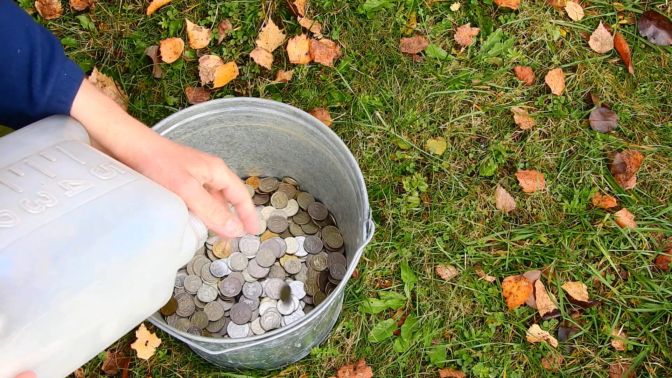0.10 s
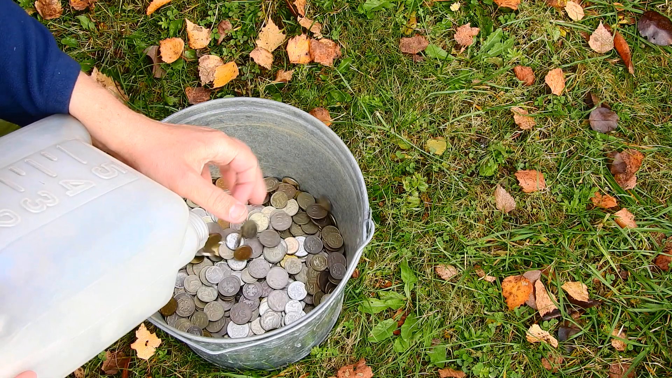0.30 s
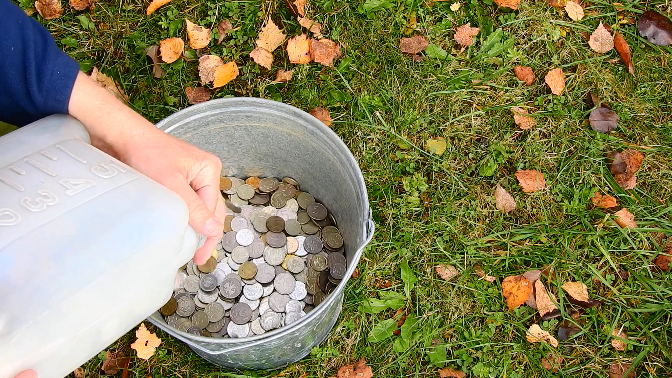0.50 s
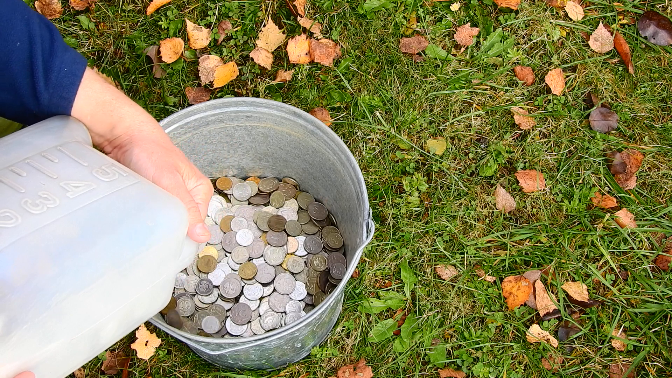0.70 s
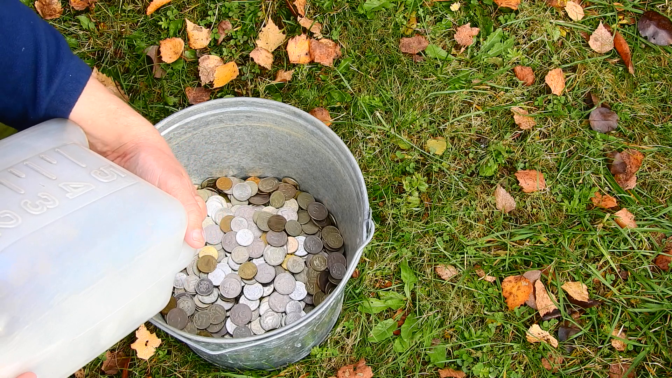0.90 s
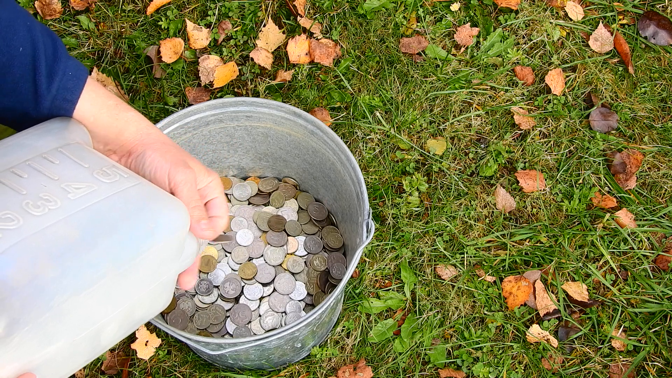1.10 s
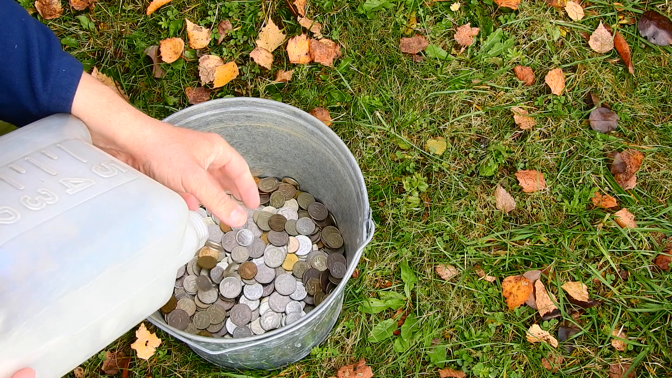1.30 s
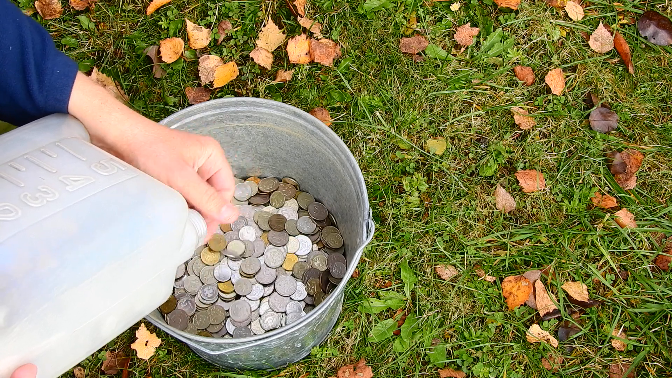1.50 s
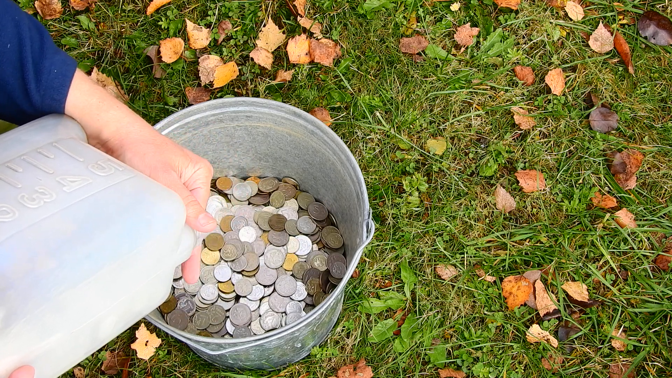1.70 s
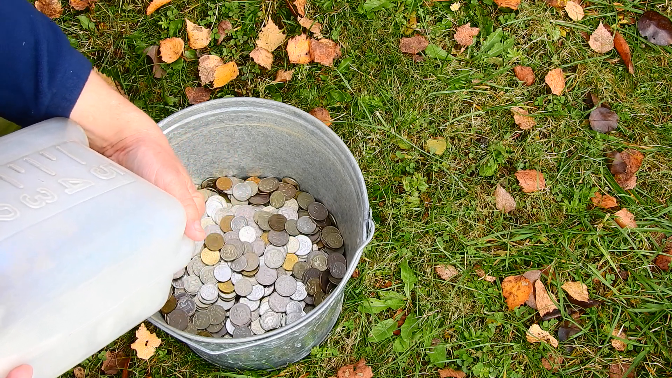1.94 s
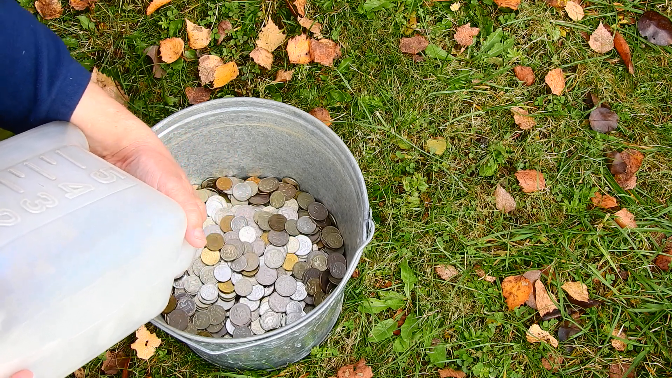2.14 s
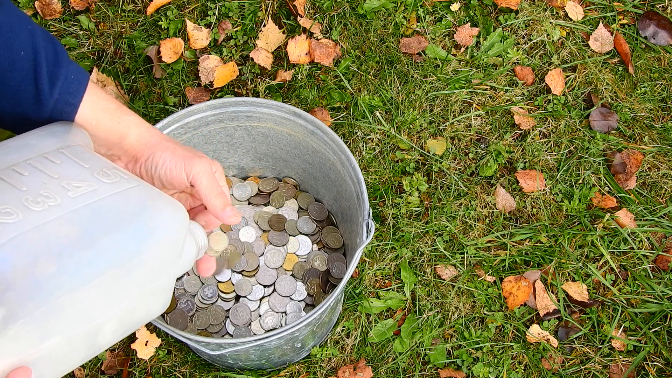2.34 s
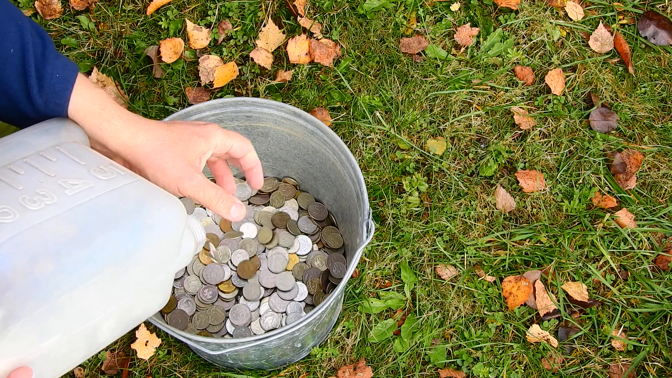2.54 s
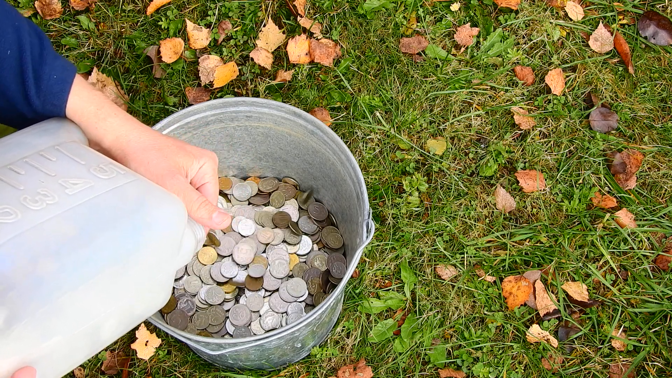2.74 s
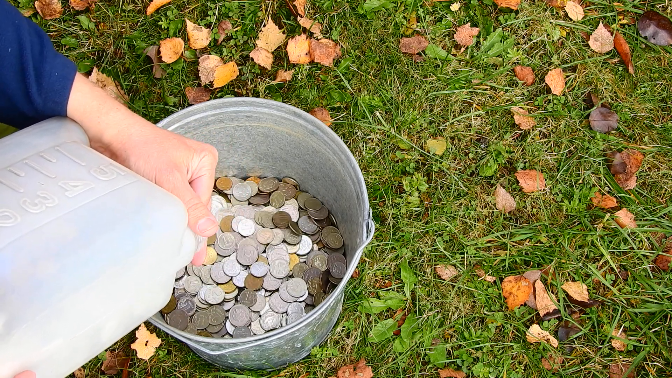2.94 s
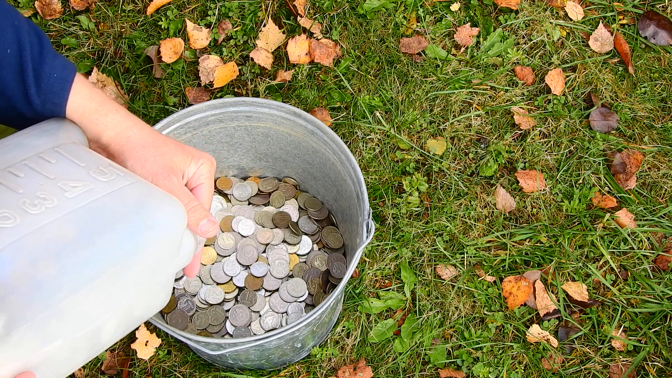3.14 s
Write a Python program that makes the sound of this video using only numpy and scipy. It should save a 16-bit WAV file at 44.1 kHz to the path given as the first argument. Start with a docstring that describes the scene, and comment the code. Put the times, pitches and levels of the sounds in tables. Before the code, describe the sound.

Coins clatter brightly into a metal bucket in bursts, with scraping inside a plastic canister between them

```python
"""Small coins drop on the pile in a steel bucket: three handfuls and a few strays, raked by hand from a canister.
Outdoors, recorded close in stereo. Each landing is a noise crack and a patter of contacts through pile resonances,
with a thump of decaying modes from the bucket's bottom. Loose coins are dying sine partials, muted by the pile.
Inside the plastic canister coins scrape and slip as coloured contacts, over faint noise of the open air.
The recorder passes the treble slightly late, clips on the hardest clinks and cuts the very top."""
import sys
import numpy as np
from scipy import signal
from scipy.fft import rfft, irfft, next_fast_len
from scipy.io import wavfile
from scipy.ndimage import uniform_filter1d

SR = 44100
rng = np.random.default_rng(int(sys.argv[2]) if len(sys.argv) > 2 else 0)


def file_out(sig):
    """Save sig as 16-bit WAV at sys.argv[1]."""
    # one column per channel
    cols = np.atleast_2d(sig).T
    # limit, then scale
    lim = np.clip(cols, -1, 1)
    pcm = np.round(lim * 32767).astype(np.int16)
    wavfile.write(sys.argv[1], SR, pcm)


N = 143325

# stereo place of the pile and loose coins: left over right, and its scatter
PAN_DB, PAN_SPREAD_DB = 2.5, 3
RIPPLE_HZ = 190  # spacing of the random resonances in a heap


def undb(db):
    """Decibels to gain."""
    return 10 ** (np.asarray(db) / 20)


def unit(x):
    """Scale to rms 1."""
    return x / np.sqrt(np.mean(x ** 2) + 1e-18)


def curve(table, index):
    """Gain over time, interpolated in dB from one column of a table."""
    rows = np.array(table, float)
    return undb(np.interp(np.arange(N) / SR, rows[:, 0], rows[:, index]))


def response(colour, ripple_db=0, detune=0):
    """Minimum-phase impulse response of a colour; ripple and detuning give each spot its own resonances."""
    size = 4096
    hz, db = np.array(colour, float).T
    hz = hz * (1 + detune * (2 * rng.random() - 1))
    bins = np.fft.rfftfreq(size, 1 / SR)
    knots = np.arange(0, SR / 2, RIPPLE_HZ)
    heights = np.clip(rng.standard_normal(len(knots)), -2, 2)
    ripple = ripple_db * np.interp(bins, knots, heights)
    level_db = np.interp(np.log(bins + 1), np.log(hz), db) + ripple
    cepstrum = irfft(level_db * np.log(10) / 20)
    # folding the cepstrum makes the response causal
    cepstrum[1:size // 2] *= 2
    cepstrum[size // 2 + 1:] = 0
    return irfft(np.exp(rfft(cepstrum)))


def spots(colour, ripple_db, count, detune=0):
    """Responses of several spots in a heap."""
    return [response(colour, ripple_db, detune) for _ in range(count)]


def through(x, body):
    """Sound passed through an impulse response."""
    return signal.fftconvolve(np.atleast_2d(x), body[None], axes=1)[:, :x.shape[-1]]


def power(x, size):
    """Short-term power of the middle of the stereo image."""
    return uniform_filter1d(x.mean(0) ** 2, size) + 1e-12


def add(out, s, x):
    """Mix x in at time s."""
    i = max(int(s * SR), 0)
    out[:, i:i + x.shape[-1]] += x[..., :max(N - i, 0)]


def pan(db):
    """Left and right gains for a level difference."""
    return undb(np.array([db, -db]) / 2)


def ring(hz, t60, size=16384):
    """One partial dying away by 60 dB in t60 seconds."""
    t = np.arange(size) / SR
    return np.sin(2 * np.pi * hz * t) * np.exp(-np.log(1000) * t / t60)


def contacts(size, per_s, spread_db, pan_db=0, scatter_db=0):
    """Random tiny collisions, each with its own strength, sign and place."""
    when, sign = rng.random((2, size))
    strength, place = rng.standard_normal((2, size))
    hits = (when < per_s / SR) * np.sign(sign - .5)
    return hits * undb(spread_db * np.clip(strength, -2, 2)) * pan(pan_db + scatter_db * place)


def blow(body, crack_s, settle_s, settle_db, pan_db, scatter_db):
    """A sharp first contact, then neighbours chatter and settle; short-term peak level 1."""
    t = np.arange(SR // 8) / SR
    crack = np.exp(-t / crack_s) * rng.standard_normal(len(t))
    chatter = contacts(len(t), 2500, 7.8, 0, scatter_db)
    chatter = undb(settle_db) * np.exp(-t / settle_s) * chatter
    x = through(crack + chatter, body) * pan(pan_db + scatter_db * rng.standard_normal(1))
    return x / np.sqrt(power(x, size=176).max())


def stream(bodies, per_s, spread_db, pan_db, scatter_db):
    """A flow of collisions shared among several bodies, evened out to a level near 1."""
    share = per_s / len(bodies)
    x = sum(through(contacts(N, share, spread_db, pan_db, scatter_db), body) for body in bodies)
    floor = 0.032 * np.mean(x ** 2)  # keeps gaps from being raised to full level
    return x / np.sqrt(power(x, size=1800) + floor)


def flight(hz, t60, seconds):
    """A coin rings freely in the air until the pile catches and mutes it."""
    tone = ring(hz, t60, size=6000)
    caught = np.maximum(np.arange(len(tone)) / SR - seconds, 0)
    return tone * np.exp(-caught / 0.005)


# colour of the open air around the bucket: (frequency [Hz], relative level [dB])
AIR_COLOUR = [(15, -30), (25, -21.5), (66, -5.5), (118, -11.5), (224, -17), (326, -22), (1390, -24),
              (1580, -28.5), (3350, -30), (6040, -29), (15000, -61.5)]


def air():
    """Faint outdoor background with a soft rumble: coloured noise, partly shared by both sides."""
    noise = rng.standard_normal((3, N))
    sides = noise[0] + 0.78 * noise[1:]
    return undb(-49.5) * pan(0.84)[:, None] * unit(through(sides, response(AIR_COLOUR)))


# raking in the canister: (time [s], level before trim [dB])
RAKE_LEVEL = [(0, -24.5), (0.2, -33), (0.5, -36), (0.7, -29), (0.8, -37), (0.98, -27), (1.03, -42),
              (1.08, -37), (1.13, -31.5), (1.25, -30.5), (1.3, -43), (1.34, -38), (1.68, -33.5),
              (1.82, -45.5), (1.88, -35.5), (2.03, -45.5), (2.08, -30.5), (2.18, -31), (2.23, -44.5),
              (2.28, -37.5), (2.31, -26), (2.42, -36), (2.5, -36.5), (2.92, -33.5), (3.02, -59),
              (3.25, -82)]
# coins slipping in the canister: (time [s], level before trim [dB])
COIN_SLIPS = [(0.02, -26.5), (0.026, -46), (0.044, -21.5), (0.057, -21.5), (0.079, -32), (0.104, -24.5),
              (0.137, -29), (0.162, -19), (0.168, -24.5), (0.879, -25.5), (0.938, -31), (0.973, -17.5),
              (1.167, -31), (1.179, -24), (1.216, -23), (1.237, -33), (1.249, -22.5), (1.316, -26),
              (1.855, -27.5), (1.92, -32), (1.96, -31.5), (2.02, -33), (2.058, -24.5), (2.069, -33),
              (2.081, -23), (2.089, -21), (2.094, -27), (2.126, -29.5), (2.137, -37), (2.152, -23.5),
              (2.168, -19), (2.294, -21.5), (2.315, -26), (2.33, -30), (2.346, -23.5), (2.366, -23.5),
              (2.381, -23), (2.39, -21.5), (2.4, -15.5), (2.405, -14), (2.412, -25), (2.426, -21),
              (2.431, -20.5), (2.453, -21), (3.059, -43), (3.238, -43.5)]
# soft bumps of the handled canister: (time [s], level before trim [dB])
WALL_BUMPS = [(1.043, -38), (1.087, -38), (1.988, -33.5), (2.674, -41)]
# colour of coins scraping behind plastic: (frequency [Hz], relative level [dB])
SCRAPE_COLOUR = [(150, -12.5), (350, -14.5), (700, -1.5), (1500, 2), (2400, 1.5), (3600, -2), (4800, -3.5),
                 (6500, -0.5), (8000, -11), (10000, -17), (12000, -25.5), (15500, -41)]
RAKE_DB, SLIP_DB, BUMP_DB = -4.5, -1, 1.5  # trims
SCRAPE_RIPPLE_DB = 4.5


def canister():
    """Raked coins scrape and slip over each other, dulled by the plastic wall, which bumps now and then."""
    heap = spots(SCRAPE_COLOUR, SCRAPE_RIPPLE_DB, count=5)
    raking = stream(heap, per_s=750, spread_db=3, pan_db=1.2, scatter_db=1.9)
    out = undb(RAKE_DB) * curve(RAKE_LEVEL, index=1) * raking

    wall = ring(hz=106.4, t60=0.036)
    wall = wall * (1 - np.exp(-np.arange(len(wall)) / SR / 0.01))  # soft attack
    wall = wall / np.abs(wall).max()
    for s, db in WALL_BUMPS:
        add(out, s, undb(db + BUMP_DB) * wall * pan(4.1)[:, None])

    for s, db in COIN_SLIPS:
        body = response(SCRAPE_COLOUR, SCRAPE_RIPPLE_DB)
        slip = blow(body, crack_s=.0018, settle_s=0.0099, settle_db=-3, pan_db=3.5, scatter_db=1.5)
        add(out, s, undb(db + SLIP_DB) * slip)
    return out


# coins landing, for bucket and pile, levels before trim:
# (time [s], clink level [dB], dull knock level [dB], bucket thump level [dB])
COIN_LANDINGS = [(0.22, -11, -35, -17), (0.227, -9, -45, -18.5), (0.267, -10.5, -22, -6.5),
                 (0.278, -6.5, -55, -46), (0.297, -6.5, -25.5, -28), (0.3, -10, -26, -17),
                 (0.314, -21.5, -45, -41), (0.322, -8, -27.5, -46), (0.338, -10.5, -47, -22),
                 (0.344, -27, -37, -17), (0.362, -15, -40, -31.5), (0.367, -11, -23, -12),
                 (0.379, -12.5, -45.5, -30), (0.39, -14, -48, -35), (0.407, -4, -31, -14.5),
                 (0.411, -9, -20.5, -19), (0.443, -7.5, -41, -26), (0.449, -10, -28.5, -18.5),
                 (0.466, -11, -18.5, -8.5), (0.485, -7.5, -29.5, -28.5), (0.513, -17, -22, -50.5),
                 (0.532, -6, -16.5, -19.5), (0.537, -21, -12.5, -14), (0.569, -13, -28, -30),
                 (0.593, -7.5, -15, -22.5), (0.624, -5, -21.5, -14.5), (0.665, -16, -40, -24),
                 (0.684, -6, -16.5, -39.5), (0.698, -6, -23.5, -46), (0.717, -9, -48, -23.5),
                 (0.727, -20, -37, -41), (0.741, -9, -26, -26), (0.824, -22, -37.5, -49),
                 (0.908, -12, -37, -19.5), (0.917, -17.5, -29.5, -30), (0.986, -8.5, -21, -46),
                 (1.051, -7.5, -20.5, -30.5), (1.099, -4, -13.5, -21.5), (1.107, -10.5, -19, -30),
                 (1.202, -14.5, -36, -54), (1.324, -5.5, -20, -13), (1.333, -8.5, -52, -49),
                 (1.353, -8, -33.5, -45), (1.368, -17, -31, -23.5), (1.399, -8.5, -26.5, -9),
                 (1.473, -7.5, -29.5, -28), (1.484, -5, -38, -38), (1.493, -8, -41, -27),
                 (1.503, -12.5, -35, -42), (1.531, -15, -47.5, -34), (1.548, -17, -48, -22),
                 (1.578, -13, -45, -35), (1.635, -7.5, -29, -31), (1.637, -18, -36, -13.5),
                 (1.639, -8, -44, -42), (1.647, -8, -35, -50), (1.7, -17.5, -37.5, -27.5),
                 (2.478, -3.5, -24, -15.5), (2.532, -16, -39, -28), (2.549, -13, -26, -12.5),
                 (2.56, -16, -33, -28), (2.571, -4.5, -28, -17), (2.592, -8.5, -31, -28),
                 (2.605, -8.5, -27, -30), (2.61, -15, -31, -35.5), (2.651, -19, -37, -35),
                 (2.671, -8.5, -24, -25), (2.677, -9, -38, -12), (2.685, -7, -55, -42),
                 (2.751, -12.5, -37, -31), (2.756, -8, -28.5, -11.5), (2.766, -9.5, -41, -24),
                 (2.79, -23, -30, -26), (2.804, -9, -34, -29), (2.813, -8, -44, -21),
                 (2.828, -15, -42, -29), (2.849, -5.5, -20, -50), (2.869, -16, -52, -54),
                 (2.901, -7.5, -54, -24.5), (2.933, -9.5, -34, -25), (2.956, -24.5, -46, -51),
                 (2.972, -24, -43, -35)]
# stream of small impacts, for bucket, loose coins and pile, levels before trim:
# (time [s], clatter level [dB], jingle level [dB], bucket level [dB])
POUR_LEVELS = [(0, -32, -31.5, -37.5), (0.2, -50, -30.5, -42), (0.25, -32, -16.5, -35.5),
               (0.31, -13, -10.5, -34), (0.4, -15.5, -14.5, -32), (0.43, -24.5, -20.5, -61),
               (0.5, -15, -6.5, -24.5), (0.56, -16.5, -57, -48), (0.66, -21.5, -22, -40),
               (0.74, -16, -54, -45), (0.79, -28.5, -42, -45), (0.87, -33.5, -38, -44.5),
               (0.93, -21, -41, -38), (1.03, -49, -42, -51), (1.08, -68, -60, -75), (1.13, -19, -30, -44),
               (1.17, -29, -43, -41.5), (1.25, -34, -27, -48), (1.3, -52, -45, -58),
               (1.34, -27, -16.5, -37), (1.44, -20, -27, -33), (1.5, -26, -11.5, -29.5),
               (1.55, -21, -16, -31), (1.66, -26.5, -22.5, -31.5), (1.78, -30, -30, -44.5),
               (1.83, -46, -78, -51), (2.05, -43.5, -75, -58), (2.1, -59, -41, -48), (2.24, -58, -75, -63),
               (2.34, -36, -29, -48), (2.46, -35, -22.5, -42), (2.5, -26.5, -12.5, -34.5),
               (2.6, -15.5, -9.5, -28.5), (2.73, -18.5, -17, -33), (2.82, -19, -13.5, -29),
               (2.89, -54, -24.5, -37.5), (2.97, -28, -22, -45), (3.02, -49, -81, -71),
               (3.25, -66, -57, -54.5)]
# modes of the loaded bottom, before scatter and cushioning: (frequency [Hz], level [dB], t60 [s])
BUCKET_MODES = [(280, 3, 0.0074), (340, 0.5, 0.033), (332.3, -11.5, 0.23), (416, 2, 0.014),
                (489, -0.5, 0.044), (524, -2.5, 0.056), (554, -14, 0.13), (605, -22.5, 0.083)]
THUMP_DB, BUCKET_DB = -5, -2  # trims
MODE_SCATTER_DB = 2


def bucket():
    """The weight of the coins drums the bucket's bottom through the pile, exciting its damped modes."""
    out = np.zeros((2, N))
    cushion = signal.butter(4, [265, 780], "band", fs=SR, output="sos")
    weights = rng.standard_normal((len(COIN_LANDINGS), len(BUCKET_MODES)))
    for (s, _, _, db), scatter in zip(COIN_LANDINGS, weights):
        thump = 0
        for (hz, mode_db, t60), weight in zip(BUCKET_MODES, scatter):
            thump = thump + undb(mode_db + MODE_SCATTER_DB * weight) * ring(hz, t60)
        thump = signal.sosfilt(cushion, thump)[None]
        add(out, s, undb(db + THUMP_DB) * thump / np.sqrt(power(thump, size=352).max()))

    body = sum(undb(db) * ring(hz, t60) for hz, db, t60 in BUCKET_MODES)
    body = signal.sosfilt(cushion, body)
    drumming = stream([body], per_s=130, spread_db=3.4, pan_db=0, scatter_db=0)
    return out + undb(BUCKET_DB) * curve(POUR_LEVELS, index=3) * drumming


# coins that bounce free and ring: (time [s], pitch [Hz], level before trim [dB])
FREE_RINGS = [(0.049, 10206, -37), (0.31, 10508, -30), (0.38, 15073, -36), (0.56, 9776, -34),
              (0.908, 8613, -31), (1.105, 9173, -30), (1.111, 8699, -30), (1.332, 14707, -38),
              (1.488, 8570, -22), (1.651, 9668, -27), (2.493, 9043, -24), (2.493, 9668, -20),
              (2.51, 10056, -23), (2.516, 8785, -22), (2.684, 14922, -36), (2.69, 10163, -26),
              (2.748, 14879, -37), (2.94, 10142, -29)]
# pitches of the kinds of coin, before detuning: (frequency [Hz])
COIN_PITCHES = [7650, 8060, 8540, 8600, 8785, 9045, 9150, 9530, 9670, 10060, 10180]
JINGLE_DB, RING_DB, OVERTONE_DB = -3, 0.5, -7  # trims, and overtone against its coin
JINGLE_PER_S, JINGLE_SPREAD_DB = 450, 10
JINGLE_T60_S, JINGLE_FLIGHT_S = .14, .028  # flight is the longest one
COIN_DETUNE, OVERTONE_HZ, OVERTONE_SHARE = .018, 14830, .13  # fraction; centre; share of coins


def loose_coins():
    """Tumbling coins of a few kinds ring briefly, some with an overtone; a few fly longer."""
    out = np.zeros((2, N))
    effort = curve(POUR_LEVELS, index=2)
    draws = rng.random((int(JINGLE_PER_S * N / SR), 8))
    for k, (when, kind, wear, edge, upper, airtime, strength, place) in enumerate(draws):
        hz = COIN_PITCHES[int(kind * len(COIN_PITCHES))] * (1 + COIN_DETUNE * (2 * wear - 1))
        seconds = airtime * JINGLE_FLIGHT_S
        tone = flight(hz, JINGLE_T60_S, seconds)
        if edge < OVERTONE_SHARE:
            overtone_hz = OVERTONE_HZ * (1 + 0.032 * (upper - .5))
            tone = tone + undb(OVERTONE_DB) * flight(overtone_hz, JINGLE_T60_S, seconds)
        s = (k + when) / JINGLE_PER_S
        gain = effort[int(s * SR)] * undb(JINGLE_DB + JINGLE_SPREAD_DB * (strength - 1.5))
        add(out, s, tone * gain * pan(PAN_DB + 16 * (place - .5))[:, None])

    places = rng.standard_normal((len(FREE_RINGS), 1))
    for (s, hz, db), place in zip(FREE_RINGS, places):
        tone = flight(hz, t60=.3, seconds=.06)
        add(out, s, undb(db + RING_DB) * tone * pan(PAN_DB + PAN_SPREAD_DB * place))
    return out


# colour of the bright clink, before detuning: (frequency [Hz], relative level [dB])
CLINK_COLOUR = [(1500, -41), (3500, -20.5), (4600, -9.5), (5500, -6.5), (6200, 1.5), (6800, 3),
                (7400, -3.5), (8100, -11.5), (9000, -9), (10200, -21), (11500, -20.5), (13500, -34.5),
                (14800, -24.5), (15500, -35)]
# colour of the dull knock: (frequency [Hz], relative level [dB])
KNOCK_COLOUR = [(150, -39), (400, -18.5), (800, -1.5), (1400, 1.5), (2200, -2), (3600, 4.5), (4300, -6),
                (6000, -73)]
CLINK_DB, KNOCK_DB, CLATTER_DB = -1, 0.5, -3  # trims
PILE_RIPPLE_DB, PILE_DETUNE = 3.8, .045  # detune is a fraction


def pile():
    """Coins land on coins: bright damped clinks over a duller knock, amid fine clatter."""
    out = np.zeros((2, N))
    for s, clink_db, knock_db, _ in COIN_LANDINGS:
        bright = response(CLINK_COLOUR, PILE_RIPPLE_DB, PILE_DETUNE)
        dull = response(KNOCK_COLOUR, PILE_RIPPLE_DB)
        clink = blow(bright, crack_s=.0014, settle_s=0.015, settle_db=-5.5,
                     pan_db=PAN_DB, scatter_db=PAN_SPREAD_DB)
        knock = blow(dull, crack_s=.0045, settle_s=.009, settle_db=-3, pan_db=0.3, scatter_db=1.3)
        add(out, s, undb(clink_db + CLINK_DB) * clink)
        add(out, s, undb(knock_db + KNOCK_DB) * knock)

    heap = spots(CLINK_COLOUR, PILE_RIPPLE_DB, count=10, detune=PILE_DETUNE)
    clatter = stream(heap, per_s=950, spread_db=4, pan_db=PAN_DB, scatter_db=PAN_SPREAD_DB)
    return out + undb(CLATTER_DB) * curve(POUR_LEVELS, index=1) * clatter


def scene():
    """Open air, canister, bucket, loose coins and pile together."""
    return air() + canister() + bucket() + loose_coins() + pile()


SPLIT_HZ, TREBLE_LAG_S = 4300, .0101
TOP_HZ = 15350


def record(dry):
    """The close recorder delays the treble a little, clips the peaks and cuts the top."""
    edge = SR // 8  # mirrored margin, so the delay does not wrap around
    size = next_fast_len(N + 2 * edge)
    hz = np.fft.rfftfreq(size, 1 / SR)
    treble = .5 + .5 * np.tanh((hz - SPLIT_HZ) / 40)
    lag = np.exp(-2j * np.pi * hz * TREBLE_LAG_S)
    padded = np.pad(dry, ((0, 0), (edge, edge)), "reflect")
    late = irfft(rfft(padded, size) * (1 - treble + treble * lag), size)[:, edge:edge + N]
    top_cut = signal.ellip(8, .2, 60, TOP_HZ, fs=SR, output="sos")
    return signal.sosfilt(top_cut, np.clip(late, -1, 1))


dry = scene()
out = record(dry)
file_out(out)
```